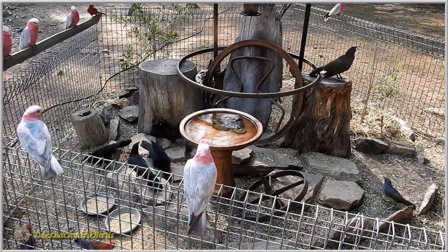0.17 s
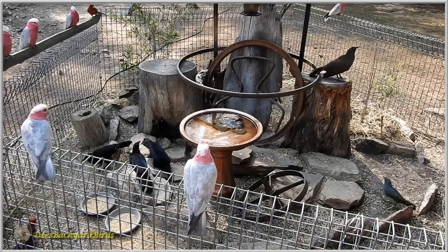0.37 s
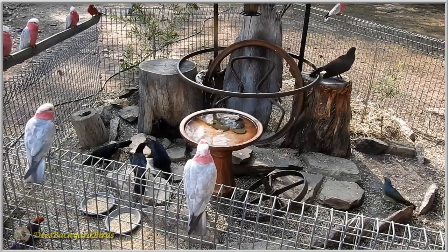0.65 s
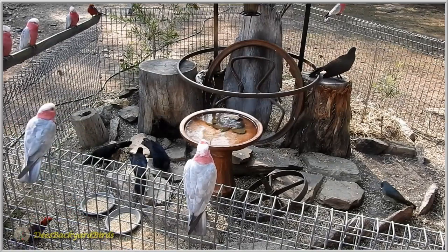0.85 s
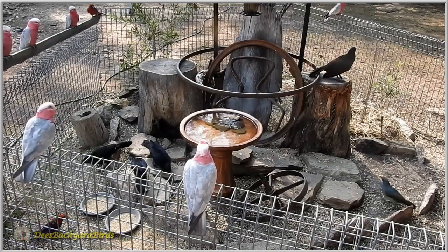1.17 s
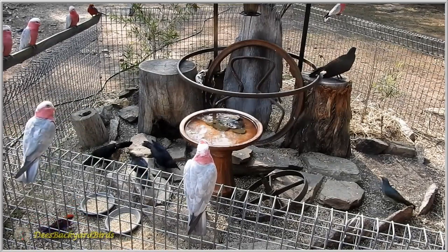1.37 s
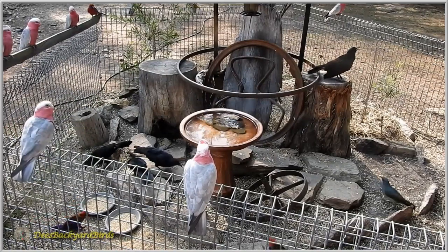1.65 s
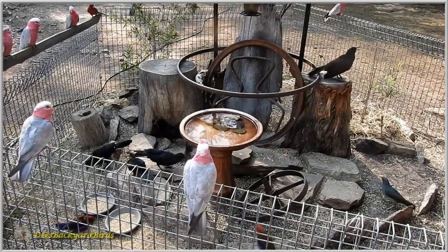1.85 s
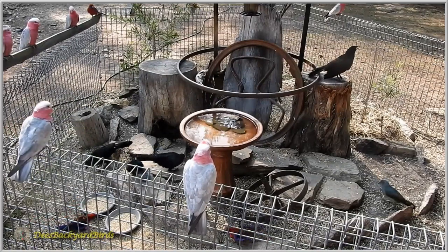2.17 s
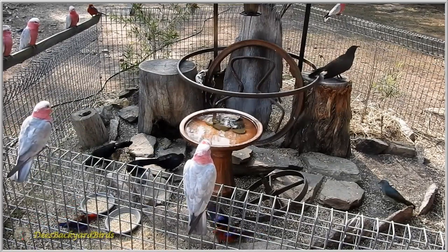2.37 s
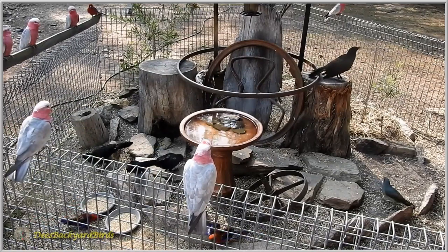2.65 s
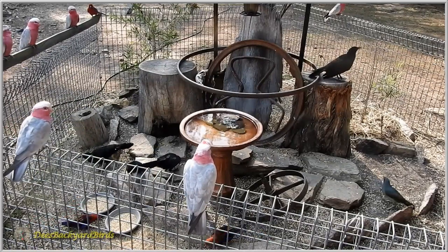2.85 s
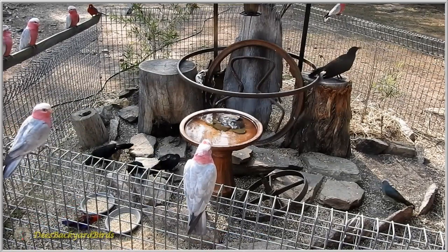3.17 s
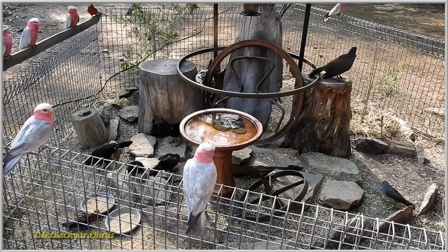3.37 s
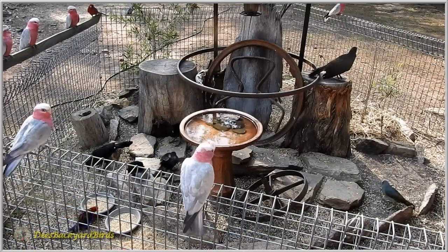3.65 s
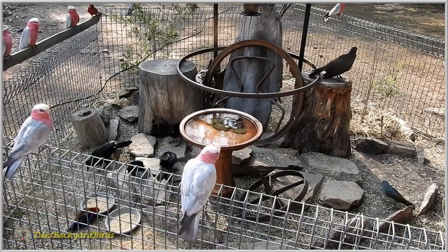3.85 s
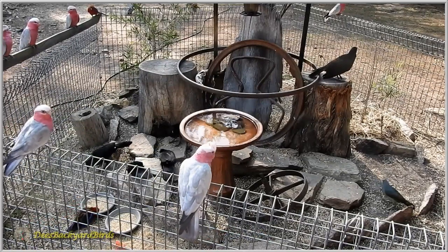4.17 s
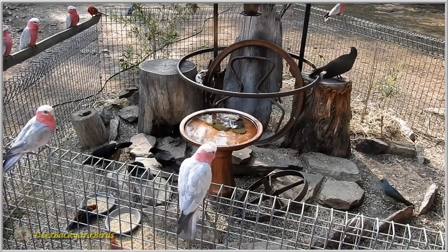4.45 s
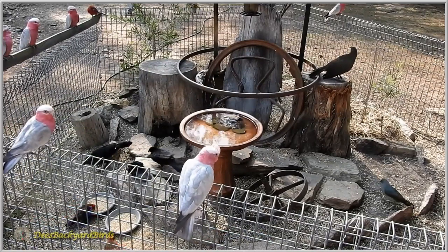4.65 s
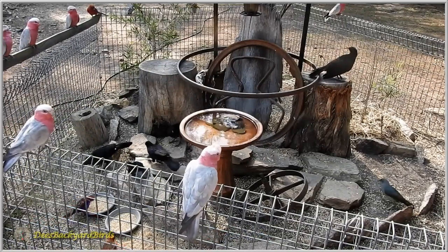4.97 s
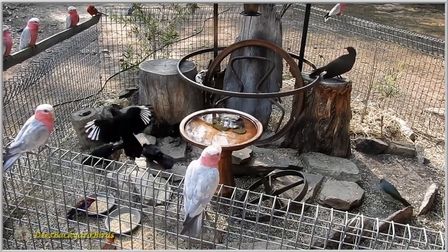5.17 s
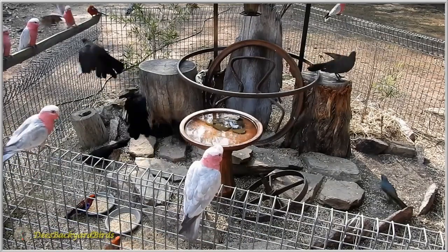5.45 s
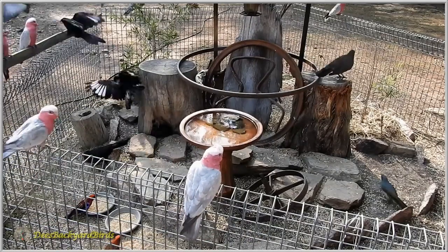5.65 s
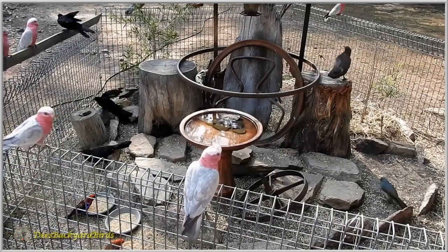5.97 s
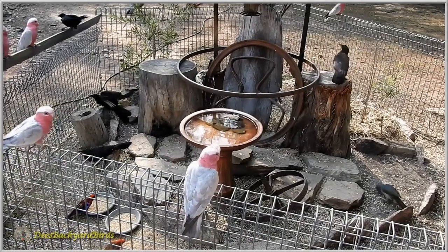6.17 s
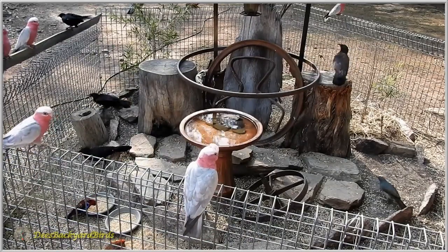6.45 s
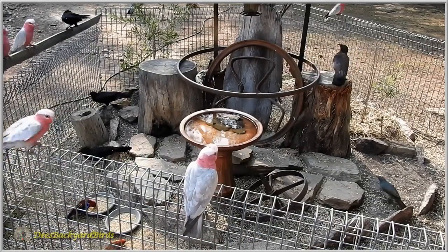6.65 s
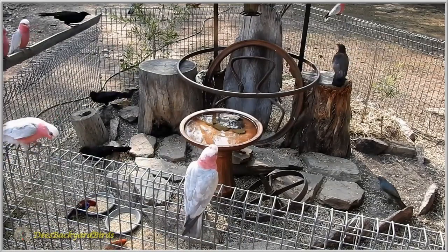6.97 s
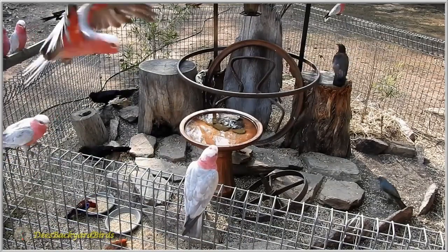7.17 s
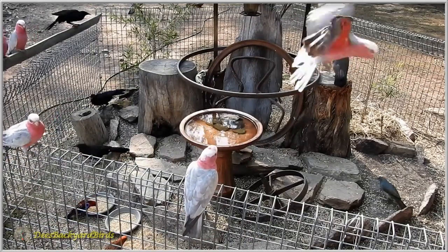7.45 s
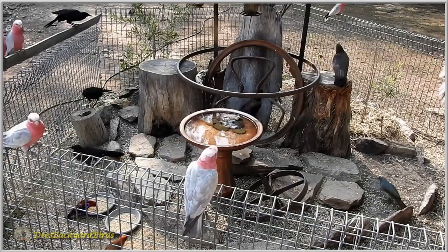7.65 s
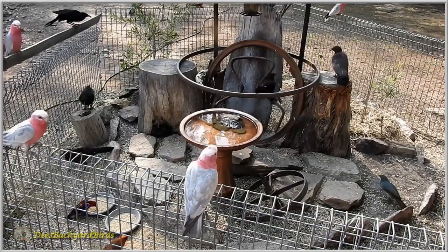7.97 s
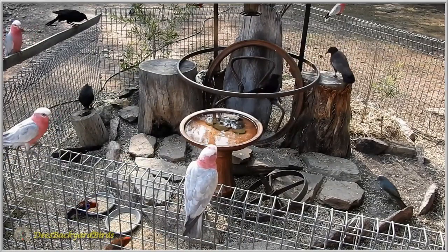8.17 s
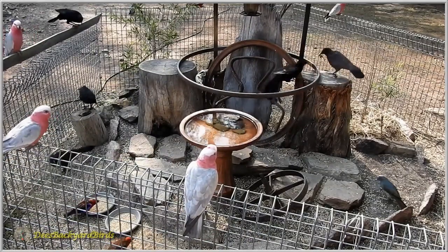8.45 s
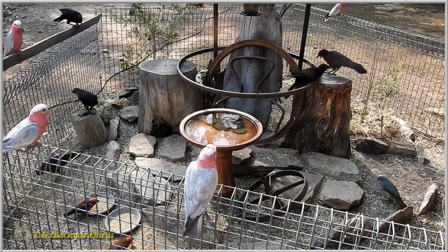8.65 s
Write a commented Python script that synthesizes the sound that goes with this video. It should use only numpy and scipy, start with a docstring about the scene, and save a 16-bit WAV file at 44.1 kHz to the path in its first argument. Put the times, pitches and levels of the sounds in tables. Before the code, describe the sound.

Cockatoos and dark garden birds stir around seed dishes and wire mesh. The first half has two long downward whistles, bursts of wing beats, rustling, soft wind thumps, squeaks and mellow notes with faint tree echoes. It calms, then a short harsh screech marks take-off, followed by steady fluttering, another seep, tiny clicks and near quiet.

```python
"""A long falling whistle over wing beats: cockatoos and choughs at a garden feeder.
Whistles and thin high seeps are gliding tones; other birds answer from the trees with echoes.
Wings, rustling, wind on the microphone and heavy wing thumps are noise shaped in pitch and strength.
A harsh buzzing screech goes with a take-off; beaks and claws click on seed dishes and wire mesh."""
import sys
import numpy as np
from scipy import signal
from scipy.fft import rfft, irfft, next_fast_len
from scipy.io import wavfile
from scipy.ndimage import uniform_filter1d

SR = 44100
rng = np.random.default_rng(int(sys.argv[2]) if len(sys.argv) > 2 else 0)


def wav_out(sig):
    """Save sig, one row per channel (or a flat mono array), as 16-bit PCM at SR to the path in sys.argv[1]."""
    wavfile.write(sys.argv[1], SR, np.round(np.clip(np.atleast_2d(sig).T, -1, 1) * 32767).astype(np.int16))


N = 388962
TIME = np.arange(N) / SR  # s


def gain_of(db):
    """Turns decibels into a factor for loudness of the wave."""
    return 10 ** (np.asarray(db) / 20)


def evened(x):
    """Scales a sound to an average strength (rms) of 1."""
    return x / np.sqrt(np.mean(x ** 2) + 1e-20)


def read(points, hz):
    """Reads a table of values between its frequencies, on a log-frequency axis."""
    f, value = np.transpose(points)
    return np.interp(np.log(hz + 1), np.log(f + 1), value)


def add(mix, s, sound):
    """Mixes a sound in at time s, cutting off what runs past the end."""
    part = mix[..., max(round(s * SR), 0):][..., :sound.shape[-1]]
    part += sound[..., :part.shape[-1]]


def wander(size, hz):
    """Smooth random drift of rms 1, moving mostly slower than hz times a second."""
    f = np.fft.rfftfreq(next_fast_len(size + SR), 1 / SR)
    noise = rng.standard_normal(2 * len(f) - 2)
    return evened(irfft(rfft(noise) / (1 + (f / hz) ** 4)))[:size]


# how alike the two microphone ports are: (frequency [Hz], coherence [0-1])
PORT_LIKENESS = [(1000, 0.71)]


def coloured(pair, spectrum, likeness=PORT_LIKENESS):
    """Blends two unrelated signals into a partly alike stereo pair with the given spectrum."""
    size = next_fast_len(N, True)
    hz = np.fft.rfftfreq(size, 1 / SR)
    a, b = rfft(pair, size)
    same = np.clip(read(likeness, hz), 0, 1)
    mid, side = a * np.sqrt(1 + same), b * np.sqrt(1 - same)
    shaped = np.array([mid + side, mid - side]) * gain_of(read(spectrum, hz))
    return evened(irfft(shaped, size)[:, :N])


def crackle(per_s, spread_db, hiss):
    """Tiny snaps of uneven size in a smooth hiss."""
    size = gain_of(spread_db * np.minimum(rng.exponential(1, N), 4))
    size = size * (rng.random(N) < per_s / SR)
    return evened(size * rng.standard_normal((2, N))) + hiss * rng.standard_normal((2, N))


def scatter(x, seconds, count=14):
    """A few early reflections from ground, stumps and leaves, different at each port."""
    delay = rng.uniform(.05, 1, count) * seconds
    strength = np.exp(-2 * delay / seconds) * (-1) ** np.arange(count)
    taps = np.zeros((2, int(seconds * SR) + 40))
    for port in taps:
        port[(delay * SR).astype(int) + rng.integers(0, 3, count)] = strength
    return signal.fftconvolve(x[None], taps / np.linalg.norm(taps[0]), axes=1)


# how fast garden echoes die: (frequency [Hz], time to fall 60 dB [s])
ECHO_TIMES = [(300, 0.46), (1200, 1.34), (5000, 0.86), (14000, 0.064)]


def garden(x):
    """Faint echoes from trees and fences, each frequency band dying at its own speed."""
    taps = rng.standard_normal((3, SR)) * (rng.random(SR) < 1500 / SR)
    hz, t, z = signal.stft(taps[:2] + 3.2 * taps[2], SR, nperseg=256)  # third row is common to both ports
    build_up = np.minimum(t / 0.014, 1)
    z = z * gain_of(-60 * t / read(ECHO_TIMES, hz)[:, None]) * build_up
    tail = signal.istft(z, SR, nperseg=256)[1]
    return signal.fftconvolve(x[None], tail / np.linalg.norm(tail[0]), axes=1)[:, :N]


def aside(pair, lead_us):
    """A source off centre reaches the left port earlier (or, if negative, later)."""
    size = next_fast_len(pair.shape[-1] + 16, True)
    turn = np.exp(1j * np.pi * np.fft.rfftfreq(size, 1 / SR) * lead_us / 1e6)  # half the lead for each port
    return irfft(rfft(pair, size) * np.array([turn, turn.conj()]), size)[:, :pair.shape[-1]]


def spells(rows, attack, release):
    """Gain for rows of (start s, length s, dB): each rises, holds and dies away."""
    power = np.zeros(N)
    for s, length, db in rows:
        rise = np.clip((TIME - s) / attack, 0, 1)
        fade = np.exp(-np.maximum(TIME - s - length, 0) / release)
        power += (gain_of(db) * rise * fade) ** 2
    return np.sqrt(power)


def syrinx(hz, overtones, waver, shimmer_db):
    """A bird's voice: an unsteady tone with second and third harmonics of the given share."""
    phase = 2 * np.pi * np.cumsum(hz * (1 + waver * wander(len(hz), 130))) / SR
    upper = np.sin(2 * phase) + gain_of(-18.0) * np.sin(3 * phase) * (hz < SR / 16)
    tone = np.sqrt(2) * (np.sin(phase) + overtones * upper)
    return tone * gain_of(shimmer_db * wander(len(hz), 82))


ONSET_RASP = 5  # extra waver at the start of a note, in multiples of its final waver


def glide(length, start, end, db, arch, overtones, waver):
    """One arched glide that starts raspy and clears as its pitch grows steadier."""
    u = np.linspace(0, 1, int(length * SR))
    hz = (start + (end - start) * u) * (1 + arch * (1 - (2 * u - 1) ** 2))
    tone = syrinx(hz, overtones, waver * (1 + ONSET_RASP * (1 - u) ** 4), shimmer_db=2)
    return tone * gain_of(db) * signal.windows.tukey(len(u), .4)


# tone colour of distant trees: (frequency [Hz], relative level [dB])
TREE_WASH = [(25, -28), (190, 4.5), (750, -4), (1150, 3), (3900, -12.5), (6870, -9), (15000, -24.5)]
AIR_DB = -57.5


def air():
    """Quiet wash of distant trees, made of steady shaped noise."""
    return coloured(rng.standard_normal((2, N)), TREE_WASH) * gain_of(AIR_DB)


# tone colour of the low puffs: (frequency [Hz], relative level [dB])
BUFFET_COLOUR = [(20, -27), (85, -16), (140, 2.5), (290, -2.5), (420, -12.5), (4000, -62.5)]
# low puffs of air: wind on the microphone, and heavy wing thumps at 0.813 and 6.109 s:
# (time of peak [s], level before the final gain [dB], time from the peak to half strength [s])
LOW_PUFFS = [(0.813, -32, 0.0028), (1.12, -33, 0.044), (1.323, -31.5, 0.03), (1.448, -30.5, 0.011),
             (1.633, -21, 0.0096), (1.697, -33, 0.13), (2.016, -26, 0.056), (2.237, -28.5, 0.015),
             (2.535, -31, 0.014), (2.604, -31, 0.069), (3.44, -50, 0.065), (6.109, -36.5, 0.012),
             (6.287, -46.5, 0.029)]
SPURT_ABOVE_HZ, SPURT_DB, SPURT_RATE_HZ = 300, 4, 45  # small eddies come and go faster than large ones


def buffets():
    """Wind puffs and heavy wing thumps: lumpy noise, mostly unlike at the ports, its upper part in spurts."""
    eddies = coloured(rng.standard_normal((2, N)), BUFFET_COLOUR, [(100, 0.11)])
    eddies /= uniform_filter1d(eddies ** 2, size=1000, axis=1).clip(1e-6) ** 0.14  # eddies push more alike
    low = signal.filtfilt(*signal.butter(2, SPURT_ABOVE_HZ, fs=SR), eddies)
    spurts = evened(gain_of(SPURT_DB * wander(N, SPURT_RATE_HZ)))
    eddies = low + (eddies - low) * spurts
    strength = sum(gain_of(db) / (1 + abs((TIME - s) / half) ** 3) for s, db, half in LOW_PUFFS)
    return eddies * strength * gain_of(3.5 + 2 * wander(N, 35))


# tone colour of feathers, here and in the wing beats: (frequency [Hz], relative level [dB])
FEATHER_COLOUR = [(40, -30), (490, 1), (2000, -5), (5000, -3.5), (7000, 5.5), (8200, -6), (11000, -18),
                  (15500, -38)]
# tone colour of pushed air, here and in the wing beats: (frequency [Hz], relative level [dB])
THUMP_COLOUR = [(20, -15.5), (70, -1.5), (260, -1.5), (1300, -67)]
# spells in which the flock stirs: (start [s], length [s], level before the gain of each part [dB])
FLOCK_STIRS = [(0, 2.99, -53), (4.65, 0.15, -55.5), (5.4, 0.65, -48.5), (6.15, 2.25, -54.5)]
STIR_ATTACK_S, STIR_RELEASE_S = 0.029, 0.12
SETTLED_DB = -59  # floor between spells, before the gain of each part


def rustle():
    """Feathers and dry litter crackle as the flock moves about, stirring the air in low lumps."""
    dry = coloured(crackle(per_s=1500, spread_db=1.0, hiss=1.34), FEATHER_COLOUR)
    dry = dry * gain_of(3.0 + 2.57 * wander(N, 25))
    stirred = coloured(rng.standard_normal((2, N)), THUMP_COLOUR) * gain_of(-9.5 + 4.4 * wander(N, 24))
    return (dry + stirred) * np.hypot(gain_of(SETTLED_DB), spells(FLOCK_STIRS, STIR_ATTACK_S, STIR_RELEASE_S))


# Levels of the flock's notes are those before reflections and echoes.
# fluted notes and small tweets from the trees:
# (time [s], length [s], start pitch [Hz], end pitch [Hz], level [dB])
FLUTED_NOTES = [(2.094, 0.1, 1624, 1374, -42.5), (2.177, 0.17, 1280, 1080, -49),
                (2.227, 0.084, 2525, 2110, -43), (2.803, 0.15, 1415, 1310, -46),
                (2.915, 0.083, 1530, 1416, -40), (2.989, 0.083, 1418, 1333, -46.5),
                (3.175, .05, 3570, 3200, -60), (3.295, 0.2, 1144, 1135, -45.5), (3.306, .13, 966, 860, -50),
                (3.578, 0.16, 1174, 1127, -39.5), (4.62, .04, 5600, 5400, -57)]
FLUTE_OVERTONES, FLUTE_WAVER = .017, .006  # share of the tone; share of the pitch late in the note
# raspy squawks: (time [s], length [s], start pitch [Hz], end pitch [Hz], level [dB],
# arch [share of the pitch])
RASPY_SQUAWKS = [(1.808, 0.16, 700, 704, -47.5, .36), (2.396, 0.11, 2730, 2873, -48, .035),
                 (2.583, 0.053, 5240, 3985, -36.5, -0.024), (2.621, 0.036, 3327, 2750, -40.5, -0.0061),
                 (2.631, 0.11, 4250, 5380, -41.5, .08)]
SQUAWK_OVERTONES, SQUAWK_WAVER = 1.5, .019  # shares as for the flutes
# faint level tones from the trees; the one at 5.15 s is a lingering echo:
# (time [s], pitch [Hz], level [dB])
FAINT_TONES = [(1.811, 4155, -59), (3.679, 5210, -61), (3.759, 1260, -58.5), (4.05, 5560, -64),
               (4.361, 1240, -64.5), (4.485, 4790, -58.5), (5.15, 1210, -58.5)]
FAINT_TONE_S = 0.24
# brief chips; the one at 2.83 s is the rough, rising onset of the fluted note at 2.80 s:
# (time [s], start pitch [Hz], end pitch [Hz], level [dB])
BRIEF_CHIPS = [(2.83, 1447, 1780, -41.5), (4.247, 1210, 1640, -32.5), (5.221, 1910, 1360, -45.5),
               (7.355, 1640, 1310, -47.5), (8.715, 2190, 1430, -48.5)]
CHIP_S, CHIP_ARCH, CHIP_OVERTONES, CHIP_WAVER = 0.0208, -0.087, 0.13, 0.011  # length, then shares
CHIP_ECHO = 0.18  # share that reaches the trees


def flock():
    """Gliding and level voices from the trees, where high notes echo best; brief chips echo little."""
    notes, chips = np.zeros(N), np.zeros(N)
    for s, *note in FLUTED_NOTES:
        add(notes, s, glide(*note, 0, FLUTE_OVERTONES, FLUTE_WAVER))
    for s, *note in RASPY_SQUAWKS:
        add(notes, s, glide(*note, SQUAWK_OVERTONES, SQUAWK_WAVER))
    for s, hz, db in FAINT_TONES:
        add(notes, s, glide(FAINT_TONE_S, hz, hz, db, arch=0, overtones=0, waver=0.0021))
    for s, *note in BRIEF_CHIPS:
        add(chips, s, glide(CHIP_S, *note, CHIP_ARCH, CHIP_OVERTONES, CHIP_WAVER))
    softened = signal.butter(8, 6600, fs=SR, output="sos")
    direct, sent = signal.sosfilt(softened, [notes + chips, notes + CHIP_ECHO * chips])
    leaves = signal.lfilter(*signal.butter(1, 3000, "high", fs=SR), sent)
    early = gain_of(-12) * scatter(direct, seconds=.03)[:, :N]
    return aside(direct + early + gain_of(-3.5) * garden(leaves), lead_us=32)


# clicks of beaks and claws: (time [s], level before dying away and port balance [dB],
# centre frequency [Hz], lead at the left port [microseconds])
BEAK_CLICKS = [(.577, -28, 6500, 0), (.624, -24, 4500, -10), (.688, -26, 6800, 0), (1.572, -8.5, 6200, -55),
               (4.023, -38, 1700, 0), (4.118, -30, 7000, 0), (4.373, -32.5, 2000, 0),
               (5.671, -26.5, 6500, 10), (6.066, -29, 6500, 10), (7.077, -30, 6800, 10),
               (8.202, -31, 4500, -10), (8.69, -35, 7500, 0)]
CLICK_CYCLES, CLICK_WIDTH = 9, 1.65  # cycles over which a click dies away; ratio of band edges to centre
SHADE_DB_PER_US = .03  # level gained by the nearer port, and lost by the other


def clicks():
    """Sharp snaps of one broad resonance with scatter; the nearer port hears them earlier and louder."""
    out, t = np.zeros((2, N)), np.arange(2048) / SR
    for s, db, centre, lead_us in BEAK_CLICKS:
        band = signal.butter(2, [centre / CLICK_WIDTH, centre * CLICK_WIDTH], "band", fs=SR)
        body = signal.lfilter(*band, rng.standard_normal(len(t)))
        snap = gain_of(db) * evened(body) * np.exp(-t * centre / CLICK_CYCLES)
        shade = gain_of(SHADE_DB_PER_US * np.array([[lead_us], [-lead_us]]))
        add(out, s, shade * aside(snap, lead_us))
    out = signal.lfilter(*signal.butter(4, 11000, fs=SR), out)
    return out + gain_of(-11) * scatter(out[0], seconds=.03, count=40)[:, :N]


def stroke(t, rise, fall):
    """A swell that peaks at t = 0 and dies away."""
    return np.exp(-(np.minimum(t, 0) / rise) ** 2 - np.maximum(t, 0) / fall)


# flights, runs of even wing beats, loudest at the nearest point and 3 dB weaker one pass time away:
# (first downstroke [s], end [s], beat period [s], time of nearest point, even outside the run [s],
# pass time [s], swish level at the nearest point before spread and flutter [dB],
# flick relative to swish [dB], thump relative to swish before spread [dB])
WING_RUNS = [(.007, .53, .1158, .068, .52, -37.5, -12, -12), (.602, .98, .1068, .78, .18, -32, -8, -13),
             (1.208, 1.26, .11, 1.62, .5, -35.5, -12, -9), (5.362, 7.14, .123, 5.8, 0.5, -39.5, -5, -5),
             (7.231, 8.41, .1246, 7.82, .42, -37.5, 1, -7)]
SWISH_SPREAD_DB, THUMP_SPREAD_DB = 1.7, -1  # from beat to beat
WHOOMP_HZ = 196  # a downstroke has a hollow note in the octave above this, before its spread
WHOOMP_SPREAD_OCTAVES, WHOOMP_SHARE = .45, .8  # from beat to beat; strength beside the thump
FLUTTER_DB, FLUTTER_HZ = 2.6, 90  # feathers flutter within a stroke


def wings():
    """Each beat is a flick, a downstroke with thump and hollow note, and a soft upstroke, all fluttering."""
    feathers = coloured(crackle(per_s=2500, spread_db=1.5, hiss=1.0), FEATHER_COLOUR)
    thumps = coloured(rng.standard_normal((2, N)), THUMP_COLOUR)
    out = np.zeros((2, N))
    for first, end, period, nearest, pass_s, top_db, flick_db, thump_db in WING_RUNS:
        lucks = rng.standard_normal((20, 3)).clip(-2, 2)
        for s, luck in zip(np.arange(first, end, period), lucks):
            distance_db = -10 * np.log10(1 + ((s - nearest) / pass_s) ** 2)
            db = top_db + distance_db + SWISH_SPREAD_DB * luck[0]
            near = abs(TIME - s) < .15
            t = TIME[near] - s
            flick = gain_of(flick_db) * stroke(t + .023, rise=.004, fall=.006)  # the wing opens
            downstroke = stroke(t, rise=0.014, fall=0.014)
            upstroke = gain_of(-12.5) * stroke(t - .055, rise=0.0223, fall=0.006)
            swish = feathers[:, near] * (flick + downstroke + upstroke)
            hz = WHOOMP_HZ * 2 ** (WHOOMP_SPREAD_OCTAVES * luck[2])
            octave = signal.butter(2, [hz, 2 * hz], "band", fs=SR)
            hollow = evened(signal.lfilter(*octave, feathers[:, near]))
            push = (thumps[:, near] + WHOOMP_SHARE * hollow) * stroke(t - .002, rise=0.018, fall=0.029)
            push_gain = gain_of(thump_db + THUMP_SPREAD_DB * luck[1])
            out[:, near] += gain_of(db) * (swish + push_gain * push)
    return out * gain_of(FLUTTER_DB * wander(N, FLUTTER_HZ))


# thin high seeps: (time [s], length [s], top pitch [Hz], level before fading in and out [dB],
# share scattered by foliage [0-1])
THIN_SEEPS = [(1.699, .1, 7320, -26.5, 0.42), (2.351, 0.099, 7254, -29.5, 0.52),
              (3.745, 0.16, 7110, -28, 0.65), (5.21, 0.073, 7280, -31, 0.02),
              (7.18, 0.12, 7250, -35.5, 0.18)]
SEEP_ENDS_HZ = 6630  # each seep starts and ends here


def seeps():
    """Arched notes near 7 kHz; reflections beat against the glide and make it flutter."""
    out = np.zeros((2, N))
    for s, length, top, db, share in THIN_SEEPS:
        u = np.linspace(0, 1, int(length * SR))
        hz = np.interp(u, [0, .5, 1], [SEEP_ENDS_HZ, top, SEEP_ENDS_HZ])
        tone = syrinx(hz, overtones=0, waver=0.0073, shimmer_db=0.5)
        share = np.clip(share, 0, 1)
        tone *= gain_of(db) * signal.windows.tukey(len(u), 0.15 + share)
        echoes = scatter(tone, seconds=0.023)
        echoes = echoes * np.linalg.norm(tone) / np.linalg.norm(echoes, axis=1)[:, None]  # as strong as the tone
        add(out, s, np.sqrt(1 - share) * tone)
        add(out, s, np.sqrt(share) * echoes)
    return out + gain_of(-14.5) * garden(out.mean(0))


# bursts of the harsh screech: (start [s], length [s], level before echoes [dB])
SCREECH_BURSTS = [(5.39, 0.0075, -25.5), (5.406, 0.081, -22.5), (5.5, 0.061, -29)]
# pitch of the screech before jitter: (time [s], pitch [Hz])
SCREECH_GLIDE = [(5.48, 492), (5.5, 399), (5.62, 349)]
# tone colour of the throat: (frequency [Hz], relative level [dB])
THROAT_COLOUR = [(300, -38), (680, -0.5), (1100, 4.5), (2200, -1.5), (6000, 4), (8000, -9.5), (11000, -19),
                 (15000, -75)]
SCREECH_ATTACK_S, SCREECH_RELEASE_S = 0.0057, 0.031
SECOND_SIDE = 1.37  # pitch ratio of the two sides of the syrinx, the bird's voice organ
SCREECH_JITTER = .07  # share of the pitch, scaled by effort plus a tenth


def screech():
    """Two sides of the syrinx buzz roughly; as effort fades one is left, clearer and sinking in pitch."""
    level = spells(SCREECH_BURSTS, SCREECH_ATTACK_S, SCREECH_RELEASE_S)
    effort = level / level.max()
    pitch = np.interp(TIME, *np.transpose(SCREECH_GLIDE))
    buzz = np.zeros(N)
    for ratio, share in ((1, 1), (SECOND_SIDE, effort)):
        jitter = 1 + SCREECH_JITTER * (effort + .1) * wander(N, 110)
        turns = np.cumsum(ratio * pitch * jitter) / SR
        harmonics = sum(np.cos(2 * np.pi * (k * turns + rng.random())) for k in range(1, 18))
        buzz += share * evened(harmonics)
    drive = .9 * rng.standard_normal((2, N))  # breath noise
    drive[0] = scatter(drive[0] + buzz, seconds=.012)[0, :N]
    out = coloured(drive * gain_of(2 * wander(N, 250)), THROAT_COLOUR) * level
    return aside(out, lead_us=13.0) + gain_of(-23) * garden(out.mean(0))


# long falling whistles, one curve each: (time [s], pitch [Hz], level before the port balance [dB])
FALLING_WHISTLES = [
    [(0.0, 2023, -28.5), (0.29, 1899, -20), (0.404, 1802, -30), (0.432, 1770, -40)],
    [(1.754, 1360, -47), (1.769, 1875, -39.5), (1.801, 2230, -36), (1.829, 2170, -27.5), (1.851, 2063, -34),
     (2.157, 1957, -31.5), (2.273, 1964, -26), (2.425, 1894, -18), (2.545, 1843, -34.5),
     (2.575, 1730, -35.5)],
]
DROP_S, DROP_HZ, DROP_DB = 0.019, 1410, 0  # closing drop: length, final pitch, change of level


def whistles():
    """Long clean notes, nearly pure tones that sink slowly and drop off at the end."""
    out = np.zeros(N)
    for rows in FALLING_WHISTLES:
        end, _, end_db = rows[-1]
        s, hz, db = np.transpose([*rows, (end + DROP_S, DROP_HZ, end_db + DROP_DB)])
        t = np.arange(s[0], s[-1], 1 / SR)
        tone = syrinx(np.interp(t, s, hz), overtones=0.011, waver=0.0013, shimmer_db=0.72)
        add(out, s[0], tone * gain_of(np.interp(t, s, db)) * signal.windows.tukey(len(t), .02))
    return out * gain_of([[-1.7], [1.4]]) + gain_of(-26) * garden(out)  # louder on the right


def scene():
    """All birds over the garden air."""
    background = air() + buffets() + rustle() + flock()
    return background + clicks() + wings() + seeps() + screech() + whistles()


EDGE_HZ = 15500


def record(dry):
    """Cuts the treble steeply above the edge frequency."""
    low_pass = signal.firwin(511, EDGE_HZ, window=("kaiser", 9), fs=SR)
    return signal.oaconvolve(dry, low_pass[None], "same")


dry = scene()
out = record(dry)
wav_out(out)
```